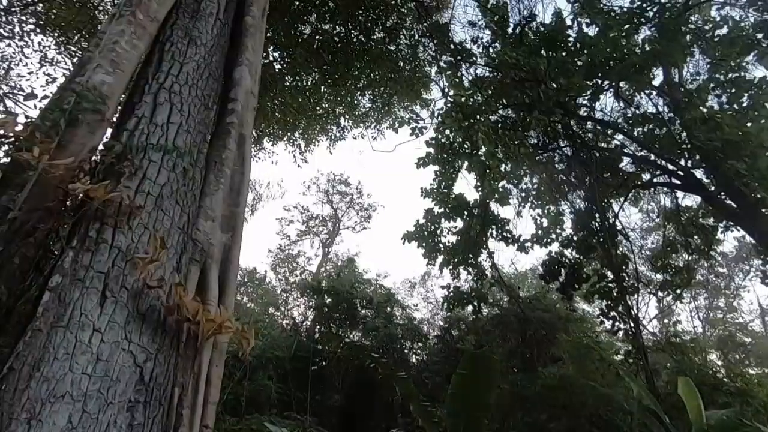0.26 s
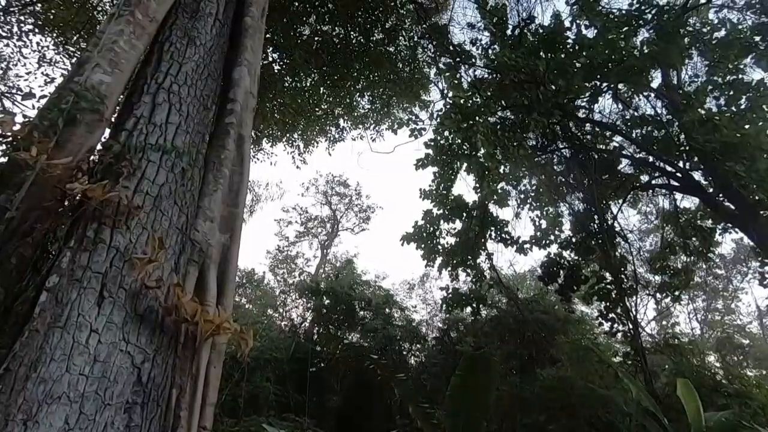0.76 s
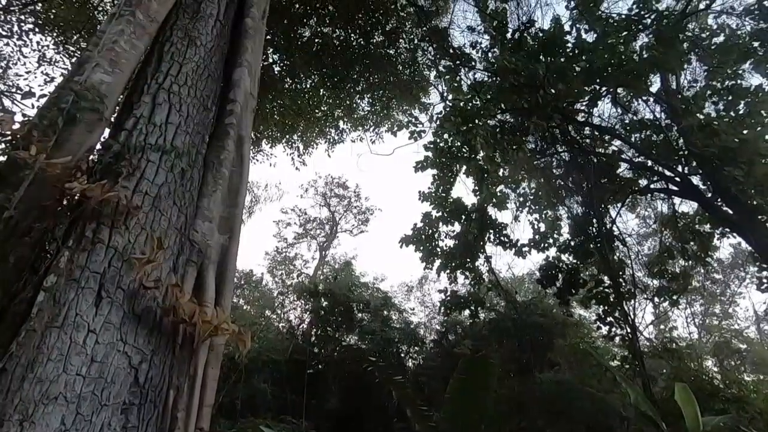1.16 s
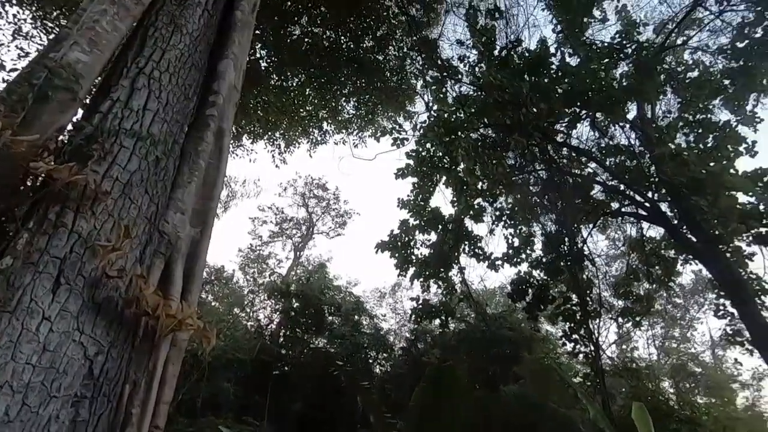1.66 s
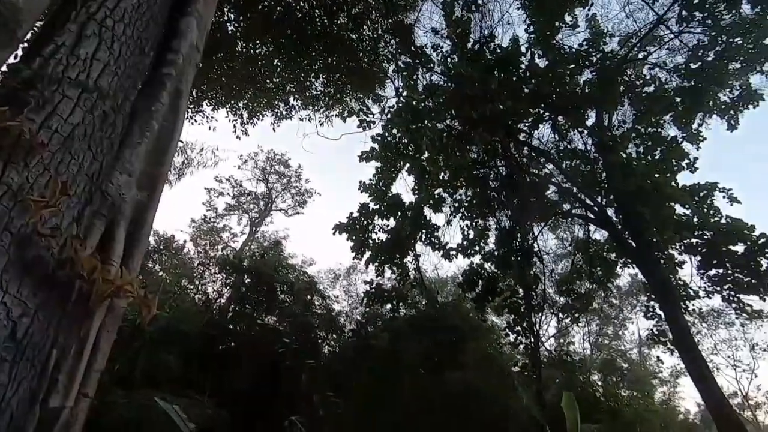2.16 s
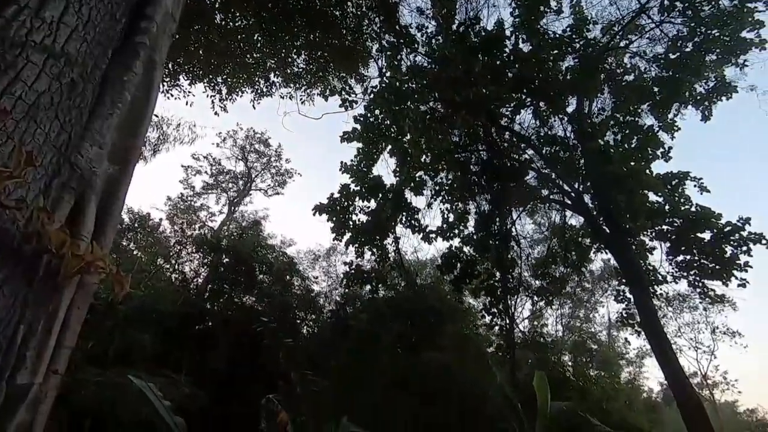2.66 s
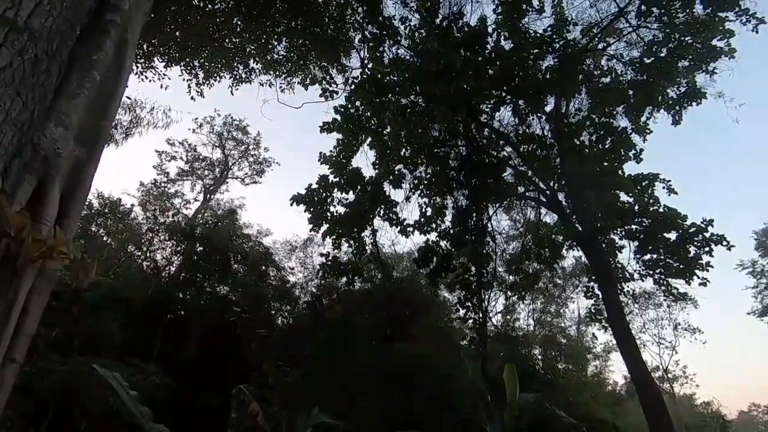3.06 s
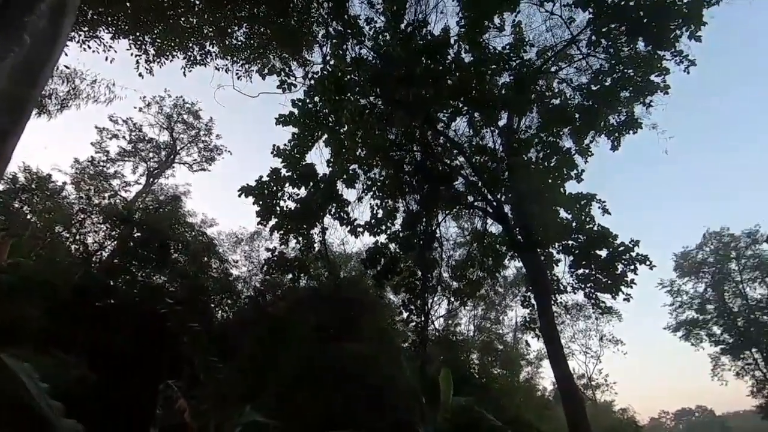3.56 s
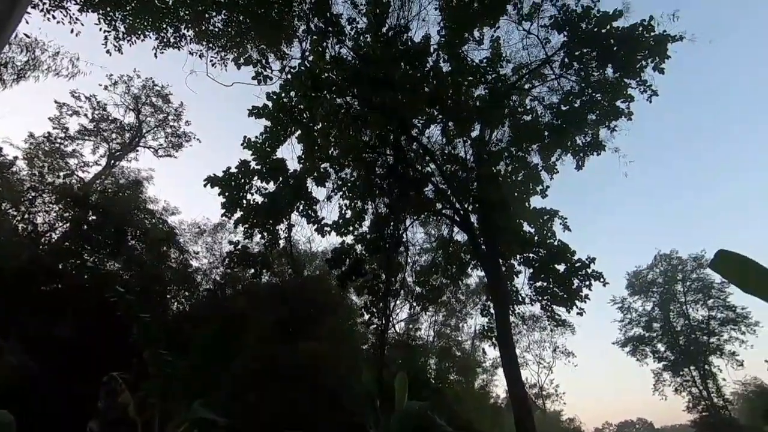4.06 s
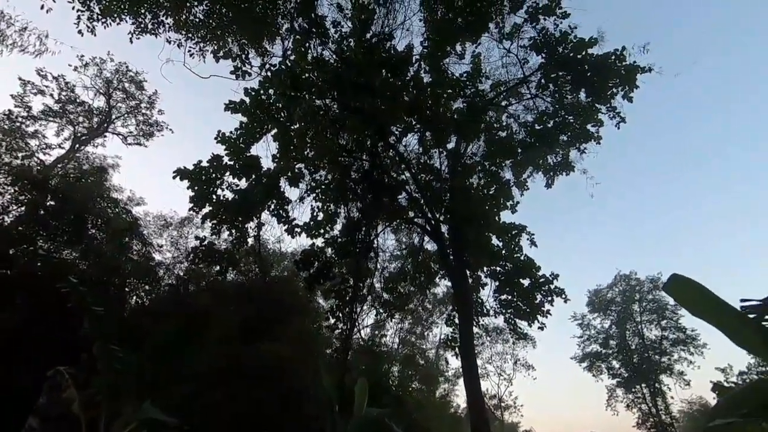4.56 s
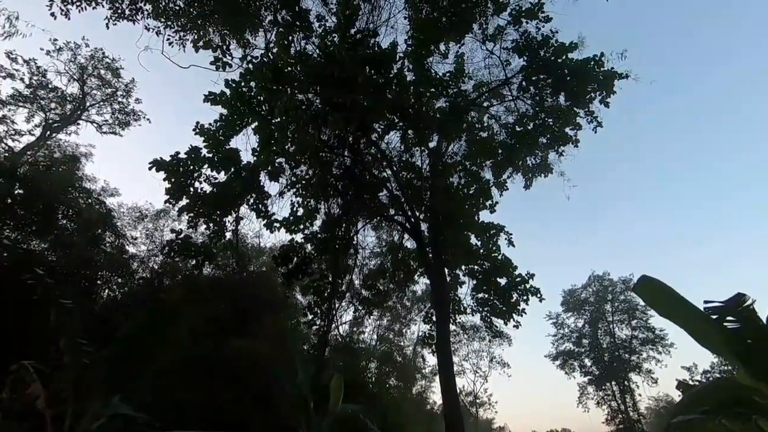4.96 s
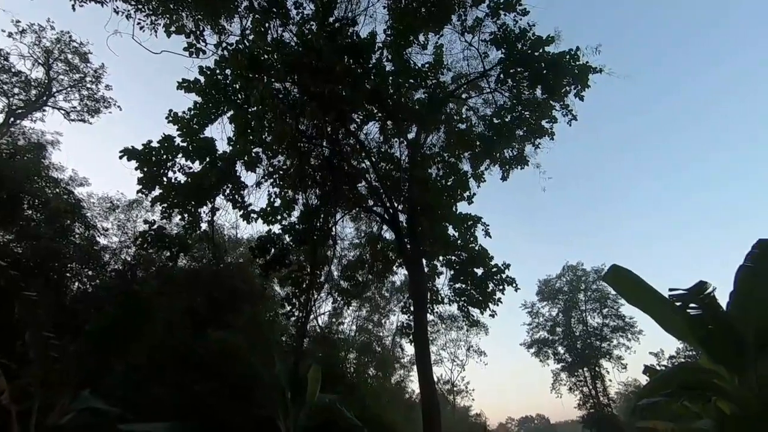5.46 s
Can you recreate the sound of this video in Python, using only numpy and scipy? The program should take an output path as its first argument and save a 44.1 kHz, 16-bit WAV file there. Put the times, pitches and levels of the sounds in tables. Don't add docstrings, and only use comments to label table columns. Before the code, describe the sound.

A quick fade-in from silence at about 0.2 seconds reveals a forest at dawn: small birds chirping in short rising sweeps around 2.5 to 3.8 kHz, some near, many far and blurred by tree echo, over a quiet hush of leaves. Faint doves coo far away from 0.6 to 2.1 seconds. Soft hollow finger taps cluster between 1.2 and 1.8. Sound is mono and slightly dull at first, then widens to stereo from about 2.6. A sharp bird gives a strong falling call at 2.8, with a bright chirp at 3.0. Low bumps, scratches and rumble come around 3.2 to 3.9. From 4.1 a nearer whistler slides upward, strongest at 4.4, amid a dense chirp cluster. The loudest sharp call comes at 4.9, then heavy, bassy microphone thumps at 4.95, 5.15 and 5.5, with whistles until the end at about 5.7.

```python
import sys
import numpy as np
from scipy import signal
from scipy.fft import rfft, irfft, next_fast_len
from scipy.io import wavfile
from scipy.ndimage import uniform_filter1d, map_coordinates

SR = 44100
rng = np.random.default_rng(int(sys.argv[2]) if len(sys.argv) > 2 else 0)


def unload_audio(sound):
    columns = np.transpose(np.atleast_2d(sound))
    steps = np.round(np.clip(columns, -1, 1) * 32767)
    wavfile.write(sys.argv[1], SR, steps.astype(np.int16))


def decibels_to_gain(level_db):
    exponent = np.asarray(level_db, float) / 20
    return 10 ** exponent


N = 251590
TIME = np.arange(N) / SR


def unit(x):
    return x / np.sqrt(np.mean(x ** 2) + 1e-20)


def along(points, hz):
    f, v = np.transpose(points)
    return np.interp(np.log(hz + 1), np.log(f + 1), v)


def curve(rows):
    return np.interp(TIME, *np.transpose(rows))


def wobble(rate, size=N):
    knots = rng.standard_normal(int(size * rate / SR) + 4)
    return map_coordinates(knots, [TIME[:size] * rate])


def coloured(x, spectrum):
    m = next_fast_len(N + 8192)
    gain = decibels_to_gain(along(spectrum, np.fft.rfftfreq(m, 1 / SR)))
    return irfft(rfft(x, m) * gain, m)[..., :N]


def add(track, s, sound, side):
    at = max(round(s * SR), 0)
    sound = sound[:N - at]
    track[:, at:at + len(sound)] += np.outer([1, side], sound)


def tone(hz):
    return np.sin(2 * np.pi * np.cumsum(hz) / SR)


def echoes(x, side_db):
    # f/Hz, t60/s
    forest = [(600, 1), (3000, 0.71), (6000, 0.8), (12000, 0.013)]
    out, hop = np.zeros((2, N + SR)), SR // 3
    for at in range(0, N, hop):
        noise = rng.standard_normal((2, SR * 2 // 3))
        hz, t, z = signal.stft(noise, SR, nperseg=256)
        decay = decibels_to_gain(-60 * t / along(forest, hz)[:, None])
        tail = signal.istft(z * decay, SR, nperseg=256)[1]
        tail = tail / np.linalg.norm(tail[0])
        wet = signal.fftconvolve(x[None, at:at + hop], tail, axes=1)
        start = at + 300
        out[:, start:start + wet.shape[1]] += wet[:, :N + SR - start]
    return out[:, :N] * decibels_to_gain([[0], [side_db]])


def hush():
    # f/Hz, level/dB per Hz
    middle_colour = [(53, -45), (90, -25), (108, -3.5), (191, 1.5), (537, -15.5), (800, -8.5), (1140, -22),
                     (1540, -14), (2200, -11), (2950, -6.5), (3470, -15), (4520, -16), (11500, -37),
                     (15000, -78), (22000, -120)]
    # f/Hz, level/dB per Hz
    side_colour = [(53, -51), (90, -11), (161, 2), (413, -15.5), (787, -3), (1040, -14), (2460, -20.5),
                   (3470, -28.5), (4480, -26), (6600, -23), (15200, -60)]
    z = signal.stft(rng.standard_normal((2, N)), nperseg=512)[2]
    field = uniform_filter1d(rng.standard_normal(z.shape[1:]), 6, 0)
    field = uniform_filter1d(field, 14, 1)
    patchy = signal.istft(z * decibels_to_gain(2.6 * unit(field)), nperseg=512)[1]
    mid, side = patchy[:, :N]
    mid = decibels_to_gain(15.0) * unit(coloured(mid, middle_colour))
    side = decibels_to_gain(16.0) * unit(coloured(side, side_colour))
    return decibels_to_gain(-73.5) * np.array([mid, side])


def whistles(phrases, side, echo_db):
    dry = np.zeros((2, N))
    for rows in phrases:
        s, hz, db = np.transpose(rows)
        t = np.arange(s[0], s[-1], 1 / SR)
        edge = np.clip(np.minimum(t - s[0], s[-1] - t) / 0.00058, 0, 1)
        level = edge * decibels_to_gain(np.interp(t, s, db) + 5.5)
        pitch = np.interp(t, s, hz) * (1 + 0.0043 * wobble(71, size=len(t)))
        add(dry, s[0], level * tone(pitch), side)
    dry = dry * decibels_to_gain(1.5 * wobble(55) + .8 * wobble(160))
    return dry + decibels_to_gain(echo_db) * echoes(dry[0], side_db=-4.0)


def coo(s, length, top_hz, db):
    scoop_s, sag_hz_per_s = .04, 480
    end_hz = top_hz - sag_hz_per_s * (length - scoop_s)
    return [(s, .92 * top_hz, db - 1), (s + scoop_s, top_hz, db), (s + length, end_hz, db - 4.5)]


def distant_callers():
    # t/s, length/s, start f/Hz, end f/Hz, level/dB
    low_calls = [
        (0.412, 0.17, 1970, 1950, -77.5),
        (0.419, 0.088, 3080, 3190, -67.5),
        (2.617, 0.13, 1680, 1767, -73.5),
        (3.629, 0.025, 1690, 1500, -72),
        (3.85, 0.016, 1670, 1680, -68),
        (3.895, 0.03, 1550, 2120, -65),
        (3.942, 0.018, 1710, 1690, -61),
        (3.968, 0.024, 1740, 1710, -66),
    ]
    # t/s, length/s, top f/Hz, level/dB
    doves = [
        (.625, 0.19, 884, -71.5),
        (0.935, 0.12, 770, -73),
        (.97, 0.15, 868, -74.5),
        (1.09, 0.34, 843, -73),
        (1.388, 0.16, 660, -76),
        (1.832, 0.27, 782, -70),
    ]
    glides = [[(s, start_hz, db), (s + length, end_hz, db)] for s, length, start_hz, end_hz, db in low_calls]
    return whistles(glides + [coo(*row) for row in doves], side=0.17, echo_db=-9.0)


def hand():
    # t/s, peak/dB, ring f/Hz, t60/s, snap/dB
    thumps = [(0.771, -43, 36, .1, -30), (2.727, -39.5, 74, .06, -26.5), (4.962, 6, 88, 0.021, -39),
              (0.856, -35.5, 70.6, 0.11, -6), (3.203, -38, 31.5, 0.4, -11), (3.426, -18, 70, 0.078, -7),
              (3.584, -30, 63.3, 0.18, -6), (3.615, -20.5, 71.6, 0.075, -17), (4.574, -36, 25.8, 0.18, -19),
              (4.916, -29.5, 84.6, 0.1, 3), (4.9604, -6.5, 55, 0.14, -2), (4.9952, -8, 70, 0.08, -11.5),
              (5.113, -47, 42.4, 0.073, -15), (5.149, 0, 67.4, 0.056, -9), (5.267, -37, 30.2, 0.47, -31),
              (5.4938, -3.5, 60.6, 0.041, -6), (5.5103, -5.5, 88, 0.035, -20), (5.52, -22.5, 42, .12, -18),
              (5.598, -37, 59.7, 0.04, -2)]
    # t/s, peak/dB, ring f/Hz
    tap_events = [(0.294, -54.5, 162), (0.475, -53, 164), (0.591, -57, 170), (0.857, -43.5, 132),
                  (1.191, -41, 162), (1.257, -40.5, 140.5), (1.315, -44.5, 172), (1.374, -40.5, 166),
                  (1.453, -39, 129.4), (1.553, -51.5, 159), (1.607, -40.5, 133), (1.702, -43, 159),
                  (1.778, -41, 189.4), (2.117, -51.5, 179), (2.342, -57, 166), (2.42, -53, 170),
                  (2.522, -48.5, 183), (2.6, -45, 148.6), (2.729, -50, 166), (3.254, -57, 160),
                  (3.425, -33, 99), (3.478, -39.5, 151.4), (3.6, -33.5, 114), (3.763, -51.5, 138),
                  (3.866, -50.5, 154), (4.162, -47.5, 145.6), (4.227, -45.5, 167), (4.298, -34, 165),
                  (4.447, -36, 174.7), (4.728, -46, 267), (4.732, -37.5, 122.5), (5.575, -45, 187.8),
                  (5.605, -53, 200)]
    # t/s, peak/dB, t60/s
    scratches = [(0.388, -60.5, 0.043), (0.856, -49.5, 0.02), (1.261, -58, .03), (1.451, -48, 0.012),
                 (1.608, -56, .03), (1.62, -59, 0.23), (2.809, -65, 0.039), (2.83, -70, 0.024),
                 (3.0625, -56, 0.017), (3.2615, -52, 0.0062), (3.2855, -77, 0.028), (3.416, -48, 0.024),
                 (3.485, -49.5, 0.065), (3.512, -49, 0.028), (4.8472, -61, 0.0145), (4.871, -68, 0.032),
                 (4.9164, -73, 0.016), (4.955, -49.5, 0.23), (4.959, -30, 0.018), (4.98, -47, 0.072),
                 (5.147, -31.5, 0.033), (5.4906, -38, 0.038)]
    # f/Hz, level/dB per Hz
    skin_colour = [(200, 23.5), (700, 3.5), (1400, -8.5), (2700, 1.5), (5500, -3), (8000, -12.5),
                   (12000, -31), (15500, -43.5)]
    # t/s, rumble/dB
    grip = [(.2, -63), (.6, -67), (1.02, -59.5), (2.03, -62.5), (2.13, -52), (2.55, -69.5), (3.1, -51.5),
            (3.3, -48.5), (3.88, -41), (3.95, -50.5), (4.47, -51), (4.79, -60), (5.1, -38), (5.3, -39.5),
            (5.44, -62), (5.65, -39), (5.7, -53)]
    case, skin, taps = np.zeros((3, 2, N))
    t = np.arange(SR // 4) / SR

    for s, db, hz, t60, snap_db in thumps:
        swing = -np.sin(2 * np.pi * hz * t) * (1 - np.exp(-(t / .009) ** 3))
        add(case, s - .003, decibels_to_gain(db + 7.5 - 60 * t / t60) * swing, -.12)
        knock = decibels_to_gain(db + snap_db - 30 - 60 * t / 0.036) * np.sin(2 * np.pi * 739 * t)
        add(case, s, knock, .5)
        snap = -decibels_to_gain(db + snap_db - 60 * t / 0.052) * np.sin(2 * np.pi * 150 * t)
        add(case[::-1], s, snap, .25)

    for (s, db, hz), turn in zip(tap_events, rng.random(len(tap_events))):
        overtone = 0.16 * np.sin(2 * np.pi * 2.27 * hz * t) * decibels_to_gain(-60 * t / 0.054)
        ring = np.sin(2 * np.pi * (hz * t + turn)) + overtone
        swell = decibels_to_gain(db + 14.0 - 60 * t / 0.093) * (1 - np.exp(-t / 0.017))
        add(taps, s - .004, swell * ring, -.75)

    for s, db, t60 in scratches:
        add(skin, s, decibels_to_gain(db + 8.0 - 60 * t / max(t60, .004)) * (1 - np.exp(-t / 0.0016)), 1.4)
        tick = decibels_to_gain(db - 6 - 60 * t / .02) * (1 - np.exp(-t / 0.002))
        add(case, s, tick * np.sin(2 * np.pi * 2660 * t), .5)
    scratch = coloured(skin * rng.standard_normal((2, N)), skin_colour)

    press = uniform_filter1d(abs(taps[0]), size=SR // 10)
    rub_colour = [(60, -14), (120, 1.5), (190, 8.5), (300, -19.0), (500, -21.5), (1000, -70)]
    rub = press * unit(coloured(rng.standard_normal(N), rub_colour))

    sway_colour = [(10, -3.0), (22, -4.5), (45, -8.0), (70, -18.0), (120, -35.5), (200, -120)]
    sway = unit(coloured(rng.standard_normal((2, N)), sway_colour))
    stirred = decibels_to_gain(-15) * abs(case[0]) + decibels_to_gain(2.5) * abs(taps[0])
    stirred = uniform_filter1d(stirred, size=int(0.13 * SR))
    rumble = (decibels_to_gain(curve(grip)) + stirred) * sway * decibels_to_gain([[0], [-14]])
    return case + taps + np.outer([1, -.7], rub) + scratch + rumble


def held_note(s, length, start_hz, held_hz, db):
    slide = min(0.00491 + abs(held_hz - start_hz) / 30000, length / 2)
    dwell = 0.6
    go, there = s + dwell * slide, s + (1 + dwell) * slide
    full = there + 0.012
    end = s + length
    held_db = db - 5 * ((held_hz - start_hz) / 1000) ** 2
    soft_db = held_db - 8
    end_db = held_db - 198.5 * (end - full)
    return [(s, start_hz, soft_db), (go, start_hz, soft_db), ((go + there) / 2, (start_hz + held_hz) / 2, db),
            (there, held_hz, held_db), (full, held_hz, held_db), (end, held_hz, end_db)]


def hooked_note(s, length, start_hz, held_hz, db):
    hook_s, rise_db, fade_db_per_s = .009, 8, 45
    t = np.minimum(hook_s * np.arange(7) ** 1.3 / 2, length / 2)
    gap = np.exp(-t / hook_s)
    rows = list(zip(s + t, held_hz + (start_hz - held_hz) * gap, db - rise_db * gap))
    return rows + [(s + length, held_hz, db - fade_db_per_s * length)]


def whistler():
    # t/s, length/s, start f/Hz, held f/Hz, peak/dB
    sliding = [
        (4.137, 0.044, 2510, 2400, -49.5),
        (4.383, 0.12, 1786, 3248, -39),
        (4.576, 0.053, 2326, 2109, -51.5),
        (4.628, 0.058, 3170, 3810, -50),
        (4.715, .045, 2500, 2340, -54),
        (5.522, 0.049, 2100, 2885, -39.5),
    ]
    # t/s, length/s, start f/Hz, held f/Hz, peak/dB
    hooked = [
        (4.197, .14, 2400, 2775, -48),
        (5.232, .135, 2000, 2405, -47),
        (5.392, .05, 2850, 3530, -60),
        (5.61, .095, 3050, 3555, -42),
    ]
    phrases = [held_note(*row) for row in sliding] + [hooked_note(*row) for row in hooked]
    return whistles(phrases, side=0.32, echo_db=-4.5)


def sharp_caller():
    # t/s, slide/dB, high note/dB, slide end f/Hz, echo/dB
    calls = [
        (.19, -63, -71.5, 3270, 10),
        (1.117, -50.5, -83, 3410, 1.5),
        (2.801, -34, -50, 3238, -6.5),
        (3.335, -55.5, -89, 3380, 5),
        (3.68, -58, -92, 3396, 7.5),
        (4.1, -61.5, -95, 3410, 11),
        (4.873, -29.5, -43, 3262, -10.5),
        (5.458, -39, -80, 2802, -3.5),
    ]
    dry, send = np.zeros((2, 2, N))
    t = np.arange(SR // 20) / SR
    size = len(t)
    for s, db, high_db, end_hz, echo_db in calls:
        side = 0.12 * max(s - 2.3, 0)

        u = np.clip((t - .01) / 0.038, 0, 1)
        slide_level = u ** 1.3 * (1 - u ** 2.2) * decibels_to_gain(2.5 * wobble(200, size=size))
        slide = slide_level * tone(end_hz + (5250 - end_hz) * np.exp(-u / .27))

        swell = np.sin(np.pi * np.clip(t / .036, 0, 1)) ** .5
        burr = decibels_to_gain(3.8 * wobble(130, size=size))
        lower = tone(5330 + 45 * wobble(200, size=size))
        upper = 0.5 * tone(5900 + 260 * wobble(400, size=size))
        high = swell * burr * (lower + upper)
        call = decibels_to_gain(db + 10.0) * slide + decibels_to_gain(high_db) * high

        early = np.clip(t / .042, 0, 1)
        rasp_hz = end_hz + 2900 * (1 - early) ** 1.7 + 650 * wobble(900, size=size)
        rasp = decibels_to_gain(db - 5.0) * np.sin(np.pi * early) * tone(rasp_hz)
        add(dry, s, call + decibels_to_gain(-23.0) * rasp, side)
        add(send, s, decibels_to_gain(echo_db) * (call + rasp), 0)
    return dry + echoes(send[0], side_db=-7)


def chirp(length, start_hz, end_hz):
    u = np.linspace(0, 1, int(length * SR))
    bend = .25 * u + .75 / (1 + np.exp((.45 - u) / .11))
    swell = np.sin(np.pi * u) ** 1.1
    return swell * tone(start_hz + (end_hz - start_hz) * bend)


def flock():
    # middle t/s, start f/Hz, end f/Hz, peak/dB
    clear = [(.294, 2584, 2974, -41.5), (.687, 1899, 2570, -76), (.71, 2800, 3500, -45.5),
             (.761, 2920, 3460, -50.5), (.843, 2500, 3490, -43.5), (1.054, 2593, 3614, -44),
             (1.191, 2900, 3370, -57), (1.394, 2630, 3200, -47), (1.468, 2850, 3850, -50.5),
             (1.763, 2820, 3587, -43.5), (1.83, 2821, 3390, -44), (2.192, 2680, 3770, -48),
             (2.282, 2690, 3400, -47), (2.38, 2685, 3300, -45), (2.612, 2750, 3670, -42.5),
             (2.677, 2790, 3400, -50), (2.785, 2700, 3790, -44), (2.856, 2940, 3850, -47),
             (2.873, 4760, 4600, -45), (2.883, 4350, 3900, -44.5), (2.97, 2740, 3690, -36.5),
             (3.166, 2788, 3266, -42), (3.538, 2720, 3510, -39.5), (1.8, 2705, 3335, -47),
             (3.042, 2780, 3110, -46), (3.948, 2710, 3530, -52.5), (4.076, 2680, 3320, -50),
             (4.206, 1680, 2400, -51.5), (4.388, 2950, 3370, -44), (4.489, 3210, 2480, -34),
             (4.43, 2300, 2900, -45), (4.47, 2200, 2700, -55), (5.51, 1680, 1850, -49),
             (4.506, 2090, 2700, -41), (4.525, 2515, 3000, -43), (4.547, 2575, 3100, -45),
             (4.567, 3250, 3550, -60), (5.385, 2430, 2800, -56), (1.42, 3000, 3640, -52),
             (1.545, 2910, 3620, -62), (2.76, 2750, 3150, -50), (5.195, 3000, 3390, -53),
             (.225, 2350, 3010, -51)]
    # middle t/s, start f/Hz, peak/dB
    faint_sweeps = [(.955, 2850, -51), (1.125, 2750, -50), (1.215, 2850, -60), (1.305, 2800, -51),
                    (1.53, 2750, -49), (1.725, 2520, -53), (2.024, 2740, -60), (2.09, 2900, -54),
                    (2.222, 3100, -48), (2.452, 2700, -51), (2.518, 2890, -51), (4.38, 2170, -46),
                    (4.811, 2850, -51), (5.06, 2800, -52), (2.155, 2620, -56)]
    # middle t/s, length/s, f/Hz, peak/dB
    pips = [(.272, .035, 2370, -50), (.305, .016, 2500, -52), (.402, .014, 2580, -43),
            (.705, .025, 2570, -53), (1.2, .02, 2750, -52), (1.388, .02, 3420, -50), (1.43, .03, 1790, -65),
            (1.502, .02, 3000, -50), (1.756, .019, 3750, -48), (1.785, .018, 2650, -48),
            (1.885, .016, 2800, -46), (1.897, .02, 3400, -49), (2.144, .025, 2900, -54),
            (2.449, .015, 2800, -48), (2.647, .02, 3300, -49), (2.743, .016, 3250, -46),
            (4.011, .016, 3230, -55), (4.405, .02, 3100, -49), (4.512, .02, 2690, -44),
            (4.713, .025, 2880, -49), (4.903, .014, 2900, -42), (5.04, .016, 2660, -43),
            (5.451, .06, 2800, -35), (5.43, .03, 2820, -46), (5.465, .015, 3220, -49),
            (5.488, .018, 1840, -56), (5.523, .035, 2800, -41), (5.579, .015, 2880, -44),
            (5.63, .04, 2650, -50), (5.692, .05, 5330, -64)]
    # t/s, length/s, start f/Hz, end f/Hz, peak/dB
    thin_calls = [
        (0.329, 0.029, 4500, 3360, -54.5),
        (1.574, 0.022, 5250, 3670, -57.5),
        (3.897, 0.059, 6800, 5600, -67.5),
        (4.132, 0.057, 6720, 5450, -60),
        (4.384, 0.049, 6880, 5670, -63.5),
        (0.836, 0.037, 5100, 4330, -62),
        (1.958, 0.036, 4310, 3870, -60),
        (5.564, 0.04, 4540, 4460, -66),
        (5.669, 0.057, 5300, 5330, -74),
    ]
    # t/s, level/dB
    crowd_level = [(.36, -66), (.66, -94), (.72, -56), (1.08, -56.5), (1.2, -48.5), (1.36, -56.5),
                   (1.45, -48), (1.7, -57.5), (1.85, -51.5), (2.45, -58), (2.65, -53), (3.0, -49.5),
                   (3.3, -67.5), (3.9, -94), (4.1, -60), (5.1, -53.5), (5.38, -58), (5.7, -48)]
    near, far, thin = np.zeros((3, 2, N))
    sweeps = clear + [(s, hz, hz + 600.6, db) for s, hz, db in faint_sweeps]
    notes = [(s, 0.02 + abs(b - a) / 56000, a, b, db) for s, a, b, db in sweeps]
    notes += [(s, length, hz, hz, db) for s, length, hz, db in pips]
    for s, length, start_hz, end_hz, db in notes:
        add(near, s - length / 2, decibels_to_gain(db) * chirp(length, start_hz, end_hz), .15)
    for s, length, start_hz, end_hz, db in thin_calls:
        add(thin, s, decibels_to_gain(db) * chirp(length, start_hz, end_hz), 0)
    for when, pitch, rise, size, span, side in rng.random((300, 6)):
        low = pitch < .08 and when < .33
        start_hz = 2330 + 750 * pitch - 750 * low
        level = decibels_to_gain(-12 * low) * decibels_to_gain(-12 * size)
        call = chirp(0.02053 + 0.0206 * span, start_hz, start_hz + 350 + 750 * rise)
        add(far, when * N / SR, level * call, side - .5)
    near = near * decibels_to_gain(1.7 * wobble(130))
    crowd = decibels_to_gain(-5.5) * far / np.std(far[0]) + unit(echoes(far[0], side_db=-7.0)) * 0.94
    send = decibels_to_gain(-8.5) * near[0]
    return near + echoes(send + thin[0], side_db=-5.5) + decibels_to_gain(curve(crowd_level) - 1.0) * crowd


def scene():
    mid, side = hush() + distant_callers() + hand() + whistler() + sharp_caller() + flock()
    return np.array([mid + side, mid - side])


def treble_gate(x, share, edge_hz):
    hz, t, z = signal.stft(x, SR, nperseg=2048)
    luck = np.repeat(rng.random((2, 129, len(t))), 8, axis=1)[:, :len(hz)]
    usual = np.median(abs(z), axis=2, keepdims=True)
    weak = uniform_filter1d(abs(z), 16, axis=1) < 2.5 * usual
    chance = share[np.minimum((t * SR).astype(int), N - 1)]
    lost = weak & (hz[:, None] > edge_hz) & (luck < chance)
    return signal.istft(z * np.where(lost, .02, 1.2), SR, nperseg=2048)[1][:, :N] / 1.2


def band_limit(x):
    return signal.sosfilt(signal.butter(12, 15400, fs=SR, output="sos"), x)


def record(dry):
    # t/s, width 0-1
    opening = [(2.58, 0.01), (2.8, 0.28), (3.4, 0.81), (4.0, 0.95), (5.0, 0.74)]
    # f/Hz, gain/dB
    centre_loss = [(150, 0), (300, -6.5), (700, -3.5), (1400, -3), (2150, -7.5), (3000, -1.5)]
    # f/Hz, level/dB per Hz
    hiss_colour = [(6000, -35), (9000, -9), (12500, -5), (14500, -7.5), (15500, -15)]
    # t/s, level/dB
    warm_up = [(.17, -100), (.9, -94), (1.15, -89), (5.7, -89)]
    mid, side = (dry[0] + dry[1]) / 2, (dry[0] - dry[1]) / 2
    width = np.clip(curve(opening), 0, 1)
    mid = mid + width * (coloured(mid, centre_loss) - mid)
    veil = np.clip((1.05 - TIME) / 0.57, 0, 1)
    veiled = coloured(mid, [(6500, -0.5), (9000, -7.0), (12000, -13.5)])
    mid = mid + veil * (veiled - mid)
    hiss = decibels_to_gain(curve(warm_up)) * unit(coloured(rng.standard_normal((2, N)), hiss_colour))
    mid, side = treble_gate(np.array([mid, width * side]) + hiss, .42 * (TIME > 2.8), edge_hz=8800)
    fade = np.clip((TIME - .17) / 0.14, 0, 1)
    return band_limit(fade * np.array([mid + side, mid - side]))


dry = scene()
out = record(dry)
unload_audio(out)
```